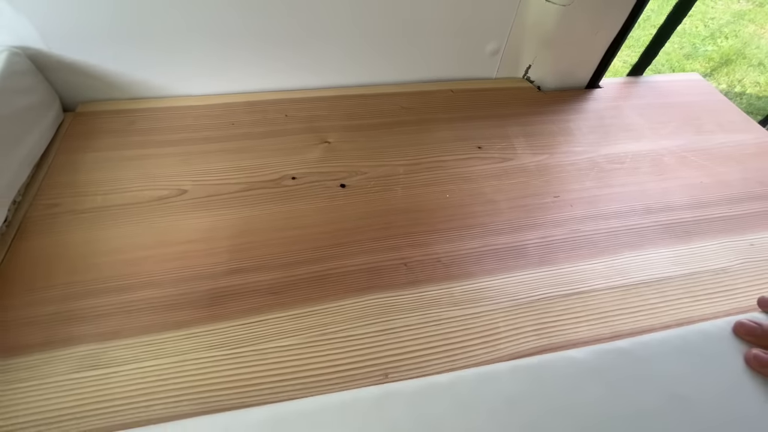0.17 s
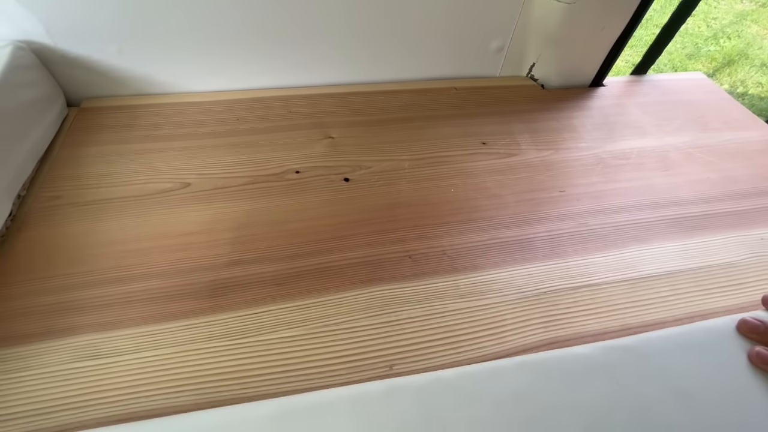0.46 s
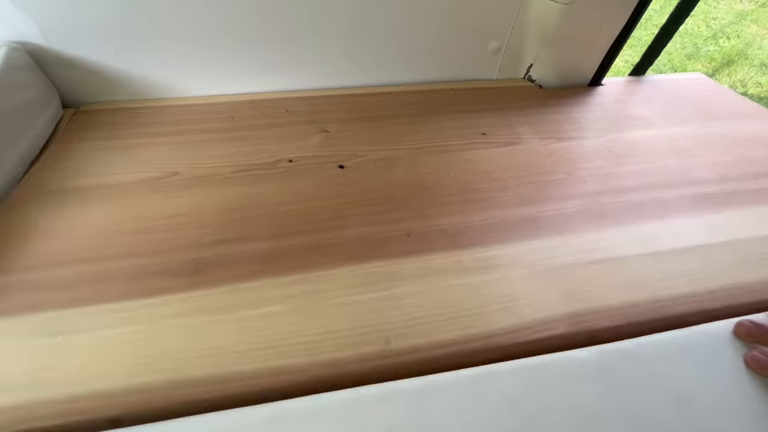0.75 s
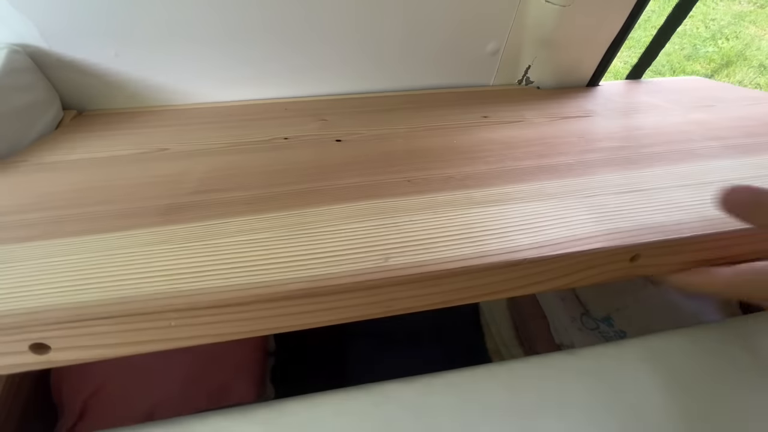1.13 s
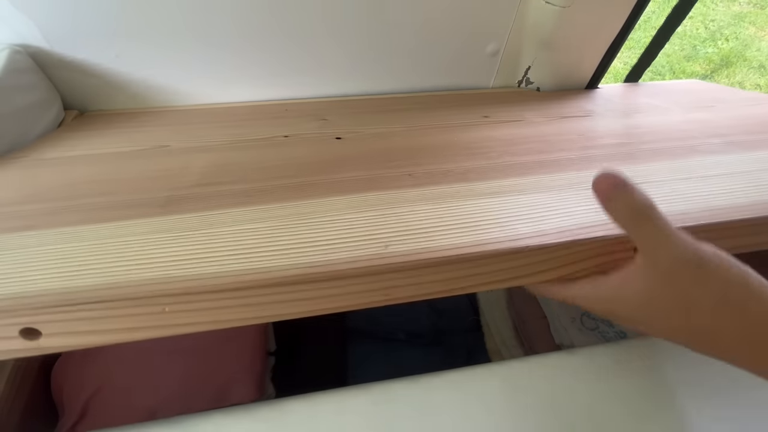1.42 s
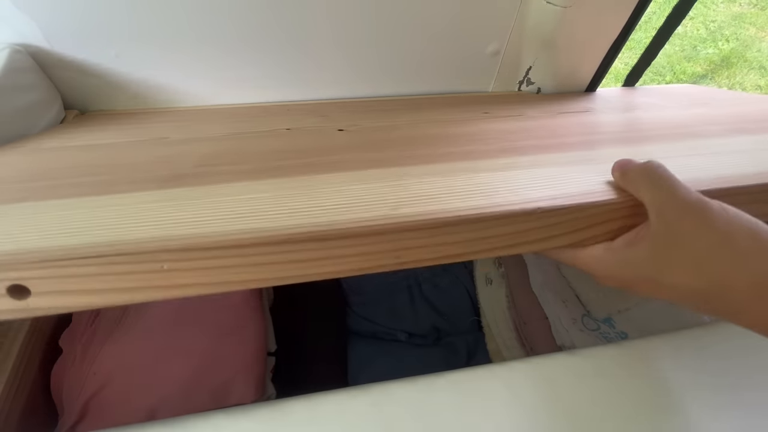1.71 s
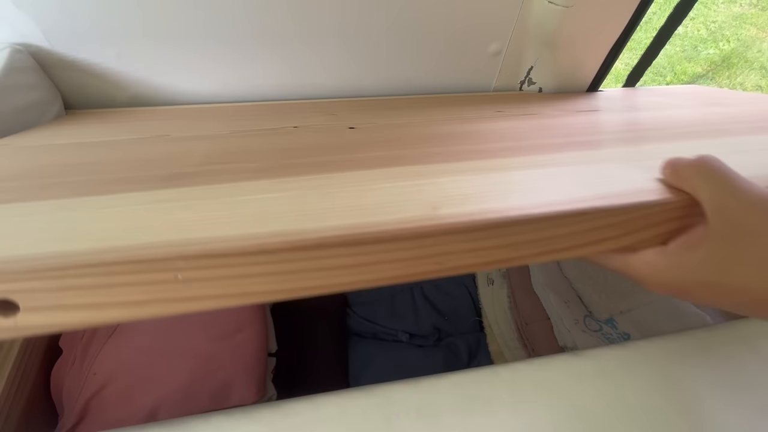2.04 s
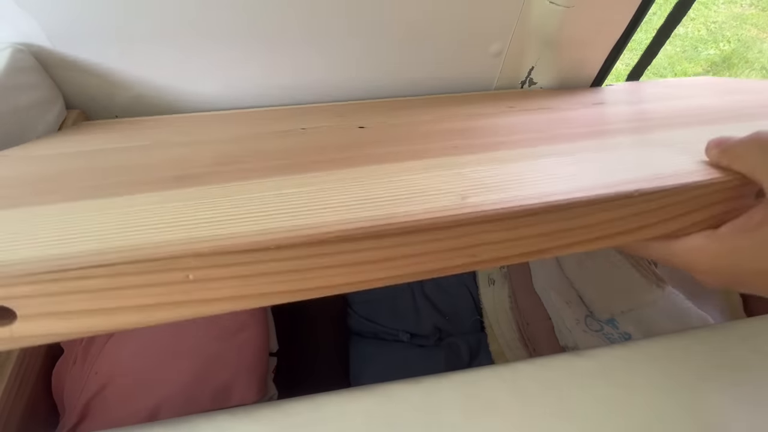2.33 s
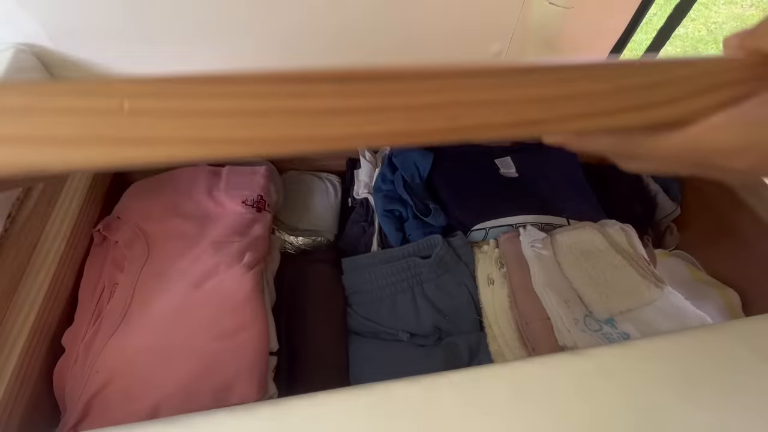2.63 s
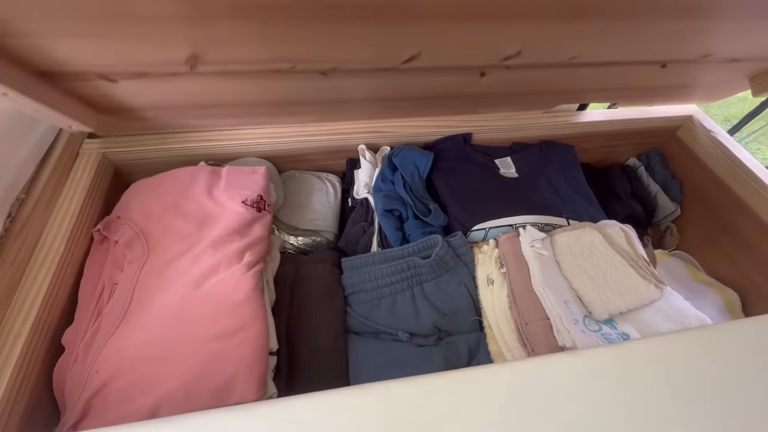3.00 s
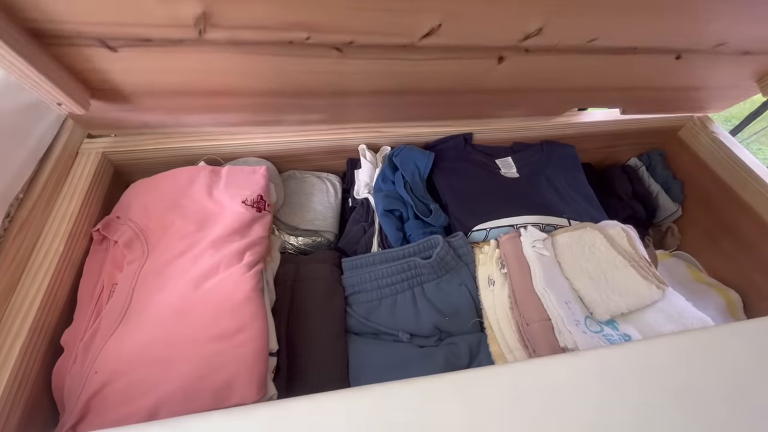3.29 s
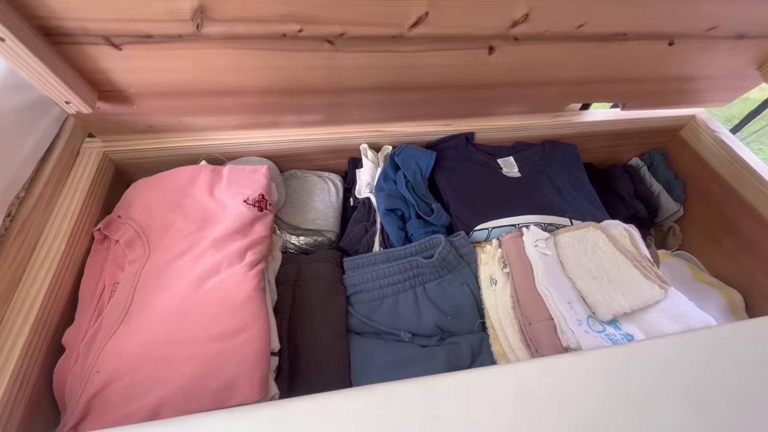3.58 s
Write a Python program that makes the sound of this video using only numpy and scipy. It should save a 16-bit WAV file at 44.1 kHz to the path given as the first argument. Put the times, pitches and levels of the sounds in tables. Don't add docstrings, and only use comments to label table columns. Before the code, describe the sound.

A wooden storage lid snaps free with bright metallic clicks, rubs and squeaks briefly, pauses with light ticks, then knocks and booms hollowly as it swings back, close up inside a small van.

```python
import sys
import numpy as np
from scipy import signal
from scipy.fft import rfft, irfft, next_fast_len
from scipy.io import wavfile
from scipy.ndimage import uniform_filter1d

SR = 44100
rng = np.random.default_rng(int(sys.argv[2]) if len(sys.argv) > 2 else 0)


def output_pcm(signal):
    pcm = np.clip(np.atleast_2d(signal).T, -1, 1) * 32767
    wavfile.write(sys.argv[1], SR, np.round(pcm).astype(np.int16))


def gain_from_db(level_db):
    decades = np.asarray(level_db, float) / 20
    return 10 ** decades


N = 165375


def rms_one(x):
    return x / np.sqrt(np.mean(x ** 2) + 1e-20)


def in_time(rows):
    t_s, value = np.transpose(rows)
    return np.interp(np.arange(N) / SR, t_s, value)


def at_hz(points, hz):
    table = np.array(points)
    return np.interp(np.log(hz), np.log(table[:, 0]), table[:, 1])


def drift(rate_hz):
    r = np.exp(-40 * np.pi * rate_hz / SR)
    white = rng.standard_normal(N // 20 + 3002)
    slow = signal.lfilter([1], [1, -2 * r, r * r], white)[3000:]
    return np.interp(np.arange(N) / 20, np.arange(len(slow)), rms_one(slow - slow.mean()))


def band_pass(x, low_hz, high_hz, order=2):
    return signal.sosfilt(signal.butter(order, [low_hz, high_hz], "band", fs=SR, output="sos"), x)


# [f/Hz, correlation/1]
LEFT_RIGHT_LIKENESS = [(60, 1), (180, 0.61), (550, -0.58), (1650, -0.14), (4970, 0.065), (15000, 0.24)]


def bands(spectrum, patchy_db, rate_hz, source=None):
    low, high = max(spectrum[0][0], 20), min(spectrum[-1][0], 16000)
    edges = np.geomspace(low, high, int(2.3 * np.log2(high / low)) + 3)
    out, together = 0, drift(rate_hz / 2)
    white = rng.standard_normal((2, 2, N + 9000)) if source is None else source
    for k, (a, b) in enumerate(zip(edges, edges[1:])):
        mid_hz = np.sqrt(a * b)
        mid, side = band_pass(white[k % 2], a, b)[:, -N:]
        alike = np.clip(at_hz(LEFT_RIGHT_LIKENESS, mid_hz), -1, 1)
        flicker_db = patchy_db * (0.89 * together + drift(rate_hz))
        gain = gain_from_db(at_hz(spectrum, mid_hz) + flicker_db)
        out = out + gain * (np.sqrt(1 + alike) * mid + np.sqrt(1 - alike) * side * [[1], [-1]])
    return rms_one(out)


# [t/s, level/dB]
SWAY_LEVEL = [(0, -45.5), (.3, -44.5), (.55, -45), (.66, -39), (.9, -43.5), (1.05, -48.5), (1.3, -48.5),
              (1.45, -42), (1.75, -44.5), (2.0, -46), (2.45, -45), (2.95, -47), (3.4, -42.5), (3.75, -41.5)]
# [f/Hz, level/dB]
RUMBLE_SPECTRUM = [(20, -0.5), (54, -1), (129, -4), (168, -5.5), (216, -9.5), (500, -33.5)]


def sway():
    return gain_from_db(in_time(SWAY_LEVEL) + 3.5) * bands(RUMBLE_SPECTRUM, patchy_db=3.5, rate_hz=7.1)


# [f/Hz, level/dB]
AIR_SPECTRUM = [(250, -26), (500, -9), (1000, -3), (2500, -3.5), (5000, -9), (8000, -29), (11000, -28),
                (13600, -30)]


def still_air():
    return gain_from_db(-58.5) * bands(AIR_SPECTRUM, patchy_db=.8, rate_hz=5.0)


# [f/Hz, level/dB]
INSECT_SPECTRUM = [(2800, -24), (3600, -8), (4300, -1.5), (5100, 3), (6200, -3.5), (7400, -13), (9000, -41)]


def insects():
    level_db, pan_db = -45.5, 10
    gain = gain_from_db(level_db + pan_db * np.array([[.5], [-.5]]))
    return gain * bands(INSECT_SPECTRUM, patchy_db=.5, rate_hz=4.0)


# [t/s, level/dB]
SLIDE_LEVEL = [(0, -52.5), (.3, -51), (.4, -48), (.62, -44), (.7, -41.5), (.88, -43), (.97, -54),
               (1.9, -52), (2.1, -49), (2.2, -55), (2.6, -50.5), (2.66, -39), (2.82, -44), (2.88, -54),
               (2.98, -52.5), (3.1, -54), (3.2, -48), (3.75, -56.5)]
# [f/Hz, level/dB]
RUB_SPECTRUM = [(300, 5), (1650, 2.5), (3500, -1.5), (9200, -11.5), (13800, -19)]


def rubbing():
    grains_per_s, shape = 6000, (2, 2, N)
    hit = rng.random(shape) < grains_per_s / SR
    grains = hit * rng.standard_normal(shape) * gain_from_db(1.1 * rng.exponential(1, shape))
    return gain_from_db(in_time(SLIDE_LEVEL)) * bands(RUB_SPECTRUM, patchy_db=1.2, rate_hz=12.0, source=grains + 1e-9)


def ring(clicks, hz, t60_s):
    r, w = gain_from_db(-60 / (t60_s * SR)), 2 * np.pi * hz / SR
    return signal.lfilter([0, np.sin(w)], [1, -2 * r * np.cos(w), r * r], clicks + 1e-18)


def strike(modes, times_s, levels_db, chatter_s, tilt_db, pivot_hz, count, turn=-1, lag_cycles=0):
    spread_db = 2.5
    out = np.zeros(N)
    late = np.sort(rng.random((len(times_s), count)), axis=1) * (np.arange(count) > 0)
    sign = np.where(late > 0, rng.choice([-1, 1], late.shape), -1)
    at = np.clip(((times_s[:, None] + late * chatter_s) * SR).astype(int), 0, N - 1)
    spread = rng.standard_normal((len(times_s), len(modes), count))
    for k, (hz, db, t60_s) in enumerate(modes):
        mode_db = levels_db + db + tilt_db * np.log2(hz / pivot_hz)
        contact_db = mode_db[:, None] + spread_db * spread[:, k] - 14 * late
        clicks = np.zeros(N)
        np.add.at(clicks, at + int(lag_cycles * SR / hz), sign * gain_from_db(contact_db))
        out += ring(clicks, hz, t60_s) * turn ** k
    return out


# [f/Hz, left minus right/dB]
TAIL_BALANCE = [(500, -3.5), (3800, 4), (15000, -1)]


def dying(tail, times_s, levels_db, tilt_db, lead_s):
    hz, db, t60_s = np.transpose(tail)
    edges, out = np.geomspace(hz[0], hz[-1], 9), 0
    white, lead = rng.standard_normal((2, 2, N)), int(lead_s * SR)
    width = np.sqrt(1 - 0.13)
    for k, (a, b) in enumerate(zip(edges, edges[1:])):
        mid_hz = np.sqrt(a * b)
        blow_db = levels_db + at_hz(np.c_[hz, db], mid_hz) + tilt_db * np.log2(mid_hz / 3000)
        clicks = np.zeros(N)
        clicks[(times_s * SR).astype(int)] = gain_from_db(blow_db)
        decay = gain_from_db(-60 / (at_hz(np.c_[hz, t60_s], mid_hz) * SR))
        fade = signal.lfilter([1], [1, -decay], clicks + 1e-18)
        mid, side = band_pass(white[k % 2] * fade, a, b) * np.sqrt(SR / (b - a) / 8)
        pan = gain_from_db(at_hz(TAIL_BALANCE, mid_hz) / 2)
        left, right = mid + width * side, mid - width * side
        out = out + np.array([pan * left, np.roll(right, lead) / pan])
    return out


# [t/s, peak level/dB, brightness/(dB/octave)]
SNAP_EVENTS = [(.074, -30, 1), (.112, -24.5, 2), (0.1191, -8, 1.9), (.304, -26, -1), (0.3107, -8.5, 2),
               (0.3314, -21, 0), (1.2894, -37.5, -0.5), (1.3199, -26, 0.7), (1.6294, -28.5, 1.2),
               (1.7519, -39, 11.5), (1.875, -46, 9.5), (2.226, -32, 1.5), (2.3436, -25.5, 1),
               (2.6394, -36, -3), (2.6973, -13.5, 4), (2.73, -26, 0), (2.772, -40, 13), (2.82, -42, 10),
               (2.9894, -34, -1.5), (3.4885, -15, -4.5), (3.504, -46, 10)]
# [f/Hz, level/dB, t60/s]
CATCH_MODES = [(540, 6.5, 0.0099), (713, 5.5, 0.019), (1030, -2, 0.013), (1691, -3, 0.09), (2021, 1, 0.05),
               (2370, -2, 0.034), (3040, 1.5, 0.013), (3503, -3.5, 0.032), (3980, 3, 0.012),
               (4896, -3, 0.013), (6360, -4.5, 0.021), (7140, -8, 0.0088), (8760, -5, 0.013),
               (11970, -13.5, 0.013)]
# [f/Hz, level/dB, t60/s]
SNAP_DECAY = [(507, -0.5, 0.11), (1440, -5.5, 0.11), (3960, -3.5, 0.14), (9000, -5.5, 0.033),
              (15500, -16, .015)]


def catch():
    t_s, db, tilt_db = np.transpose(SNAP_EVENTS)
    level_db, firm_db = -13, -25
    mode_db = db + level_db - 60 * (db < firm_db)
    snaps = strike(CATCH_MODES, t_s, mode_db, .002, tilt_db, pivot_hz=3000, count=3)
    return snaps, dying(SNAP_DECAY, t_s, db + level_db, tilt_db, lead_s=.00027)


def soft(x, length_s):
    push = np.hanning(int(length_s * SR) + 3)
    return np.convolve(x, push / push.sum())[:N]


# [t/s, knock level/dB, boom level/dB, hardness/(dB/octave), boom shrillness/(dB/octave)]
LID_KNOCKS = [(0.122, -26.5, -20, -7, 5.5), (0.313, -24.5, -21.5, 7, 11), (0.335, -26, -32.5, 2.5, 17),
              (0.365, -31, -29, -1, -2), (0.639, -30.5, -29.5, 3, -9), (1.699, -38, -39, 3.5, 0),
              (2.222, -23, -33, 5.5, 11), (2.231, -27, -18.5, -10.5, 1), (2.264, -42, -27, 7, 9.5),
              (2.295, -28.5, -30, 5.5, -7), (2.482, -15.5, -16.5, -1.3, -4), (2.509, -25.5, -15.5, 1.5, 5),
              (2.577, -18.5, -20.5, 3, 5), (2.598, -31.5, -25, -9, 2), (2.693, -15.5, -17, 5.5, -7),
              (2.729, -14.5, -14, 5, 1.5), (2.774, -20.5, -23.5, 4, 7), (2.803, -23.5, -34, 4.5, 5.5),
              (2.836, -29, -33, 4.5, 0), (3.055, -45.5, -28, -13.5, -4), (3.072, -32, -31, 7.7, 3),
              (3.172, -16.5, -27, 7, 0), (3.178, -8, -8.5, -4, 3.5), (3.191, -40, -13, 2, 2),
              (3.276, -20, -19, 4, -3), (3.288, -36, -16.5, 3, -3), (3.478, -28, -51, 9.5, 0),
              (3.484, -11, -44, 2.5, 0), (3.488, -5.5, -23, 3, 3), (3.504, -13, -17, 4, 4),
              (3.525, -12, -20, -8.5, 11), (3.542, -15.5, -17.5, -3, -6)]
# [f/Hz, level/dB, t60/s]
HELD_MODES = [(259.4, 2, 0.058), (318, 2, 0.054), (424, -7.5, 0.066), (497, -5, 0.054), (619, -7.5, 0.062),
              (752, -5, .06), (930, -9, 0.04), (1090, -25, .04), (1306, -9, 0.036)]
# [f/Hz, level/dB, t60/s]
MEETING_MODES = [(185, -13, 0.038), (250.5, 6.5, 0.085), (363.4, -4.5, 0.24), (454, -2.5, .12),
                 (487, -1, 0.1), (746, -12.5, .1), (956, -4, 0.023), (1000, -25, .08), (1297, -10.5, .04)]
# [f/Hz, level/dB, t60/s]
RESTING_MODES = [(188, -7.5, .08), (237, -7.5, 0.093), (282, -8.5, 0.1), (369, -5.5, 0.16),
                 (463, -0.5, 0.077), (532, -2.5, 0.13), (697, -5.5, 0.067), (811, -2, .06),
                 (990, -8, 0.047), (1290, -11, .04)]
# [f/Hz, level/dB, t60/s]
HOLLOW_MODES = [(51.4, -16, 0.15), (69.5, -0.5, 0.24), (82.1, -1.5, 0.16), (100.1, -2.5, 0.14),
                (126, -0.5, 0.16), (162.3, -5.5, 0.12)]
# [f/Hz, level/dB, t60/s]
WOOD_DECAY = [(466, 4, 0.025), (1030, -7, 0.13), (1780, -15, 0.13), (4380, -68, .04)]


def lid():
    t_s, knock_db, boom_db, tilt_db, shrill_db = np.transpose(LID_KNOCKS)
    meets_s, rests_s = 3.0, 3.4
    stage, wood = np.digitize(t_s, [meets_s, rests_s]), 0
    for k, modes in enumerate([HELD_MODES, MEETING_MODES, RESTING_MODES]):
        now = stage == k
        wood = wood + strike(modes, t_s[now], knock_db[now] - 4, .004, tilt_db[now],
                             pivot_hz=450, count=2, lag_cycles=.35)
    boom = strike(HOLLOW_MODES, t_s + .005, boom_db - 1.5, .01, shrill_db,
                  pivot_hz=85, count=1, turn=1, lag_cycles=.12)
    tail = dying(WOOD_DECAY, t_s, knock_db - 16 + 3 * tilt_db, tilt_db, lead_s=0.0005)
    return soft(wood, 0.00093), soft(boom, .005), tail


# [t/s, length/s, start f/Hz, end f/Hz, level/dB]
SQUEAK_EVENTS = [(.753, .011, 4750, 4800, -38), (.7615, .012, 5900, 6250, -23),
                 (.764, .008, 4500, 4400, -39), (.774, .009, 6150, 5600, -29),
                 (.826, .011, 5000, 4750, -30), (.834, .015, 4700, 4450, -29),
                 (.848, .007, 4700, 4700, -35), (2.645, .035, 2950, 3050, -46),
                 (2.67, .025, 3150, 3500, -48), (2.74, .055, 2800, 2450, -48), (.44, .14, 1700, 1680, -53),
                 (2.345, .035, 1550, 1550, -47), (3.02, .05, 880, 900, -47), (2.344, .065, 745, 740, -47),
                 (.73, .19, 122, 116, -36.5)]
# [f/Hz, level/dB]
OVERTONE_COLOUR = [(6500, 0.5), (9500, 0), (12000, -9.5), (15000, -18)]


def squeaks():
    wobble_share, flutter_db, lurch_db, rasp_share = .025, 3.5, 3.0, .8
    out, wobble, flutter, lurch = np.zeros(N), drift(660), drift(220), drift(27)
    for t_s, length_s, start_hz, end_hz, db in SQUEAK_EVENTS:
        i = int(t_s * SR) + np.arange(int(length_s * SR))
        u = np.linspace(0, 1, len(i))
        groan = start_hz <= 500
        uneven_db = lurch_db * lurch[i] if groan else flutter_db * flutter[i]
        waver = 1 + wobble_share * (wobble + lurch / 2)[i] / 2
        phase = 2 * np.pi * np.cumsum((start_hz + (end_hz - start_hz) * u) * waver) / SR
        tone = 0
        for k in range(1, 4 if start_hz > 4000 else 2):
            tone = tone + gain_from_db(at_hz(OVERTONE_COLOUR, k * start_hz)) * np.sin(k * phase)
        rough = uniform_filter1d(rng.standard_normal(len(i)), size=14)
        rasp = 1 + rasp_share * (not groan) * rough
        swell = np.sin(np.pi * u ** .7) ** .6
        out[i] += rasp * tone * gain_from_db(db + 3 + uneven_db) * swell
    return out


def van(x):
    t60_s, wall_cut_hz = 0.12, 14000
    size = next_fast_len(N + SR)
    w = 2 * np.pi * np.arange(size // 2 + 1) / size
    spectrum, out = rfft(x, size), []
    dull = 1 / (1 + 1j * w * SR / (2 * np.pi * wall_cut_hz))
    for lags in rng.uniform(0.0048, .022, (2, 10)) * SR:
        echoes = 0
        for k, lag in enumerate(lags):
            loop = gain_from_db(-60 * lag / SR / t60_s) * dull * np.exp(-1j * w * lag)
            echoes = echoes + (-1) ** k * loop / (1 - loop)
        out.append(irfft(spectrum * echoes, size)[:N])
    return np.array(out)


def placed(x, pan_db, lead_s):
    late = np.interp(np.arange(N) - lead_s * SR, np.arange(N), x)
    return np.array([x * gain_from_db(pan_db / 2), late * gain_from_db(-pan_db / 2)])


def scene():
    background = sway() + still_air() + insects() + rubbing()
    snaps, snap_tail = catch()
    wood, boom, wood_tail = lid()
    cries = squeaks()
    near = placed(snaps, pan_db=6.5, lead_s=0.000255) + placed(wood, pan_db=1.5, lead_s=0.0005)
    near = near + placed(boom, pan_db=0, lead_s=0.00017) + placed(cries, pan_db=5, lead_s=0.0003856)
    echoes = gain_from_db(-13) * van(wood + boom + snaps + cries / 2)
    return background + near + wood_tail + snap_tail + echoes


def band_limit(x):
    return signal.sosfilt(signal.butter(12, 16040, fs=SR, output="sos"), x)


PORT_GAIN_DB = [-20, 3]


def record(dry):
    port_hz, duck_from_db, duck_share, duck_s = 9200, -25.5, 0.31, 0.1
    port = band_pass(dry, port_hz / 1.12, port_hz * 1.12, order=1)
    bass_cut = signal.butter(4, 44.0, "high", fs=SR, output="sos")
    top_cut = signal.butter(14, 14800, fs=SR, output="sos")
    wet = signal.sosfilt(np.vstack([bass_cut, top_cut]), dry + gain_from_db(np.c_[PORT_GAIN_DB]) * port)
    keep = np.exp(-1 / (duck_s * SR))
    power = signal.lfilter([1 - keep], [1, -keep], np.mean(wet ** 2, axis=0))
    heard_db = 10 * np.log10(power + 1e-12)
    wet = wet * gain_from_db(-duck_share * np.maximum(heard_db - duck_from_db, 0))
    return band_limit(wet / (1 + np.abs(wet) ** 4) ** 0.31)


dry = scene()
out = record(dry)
output_pcm(out)
```